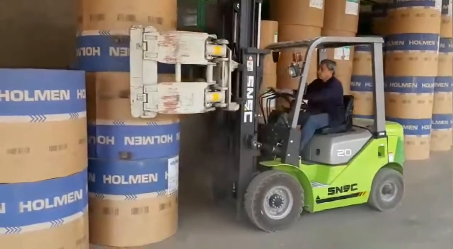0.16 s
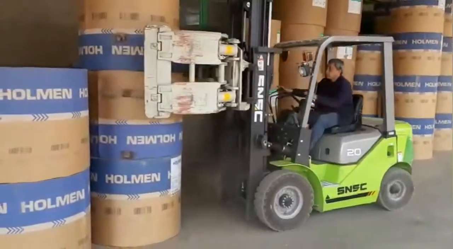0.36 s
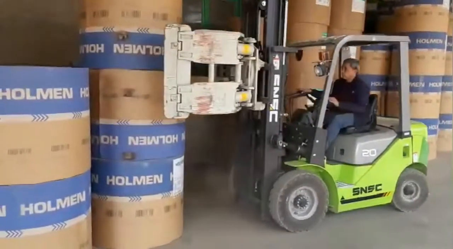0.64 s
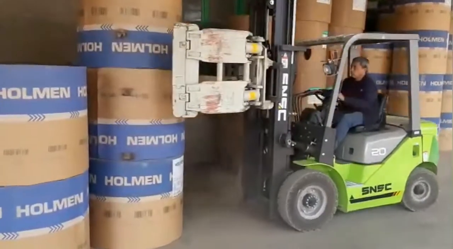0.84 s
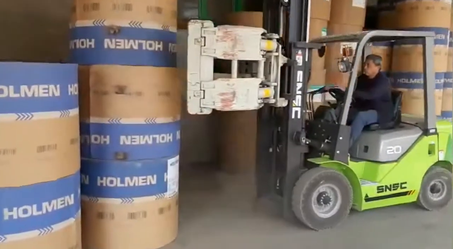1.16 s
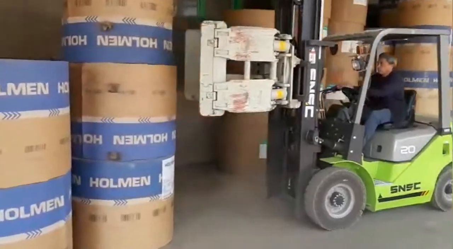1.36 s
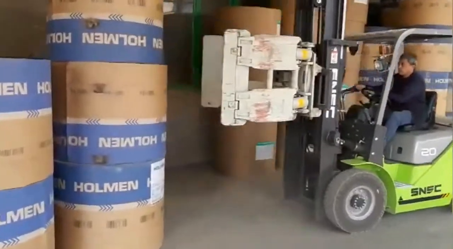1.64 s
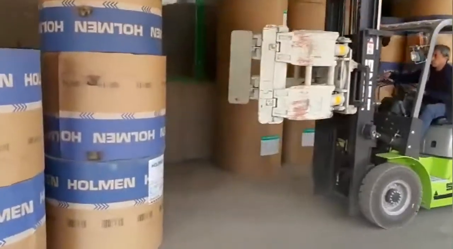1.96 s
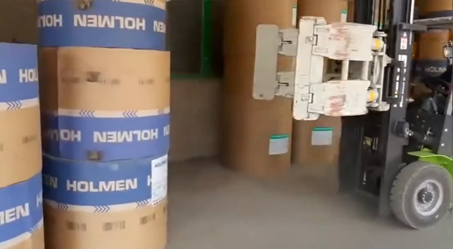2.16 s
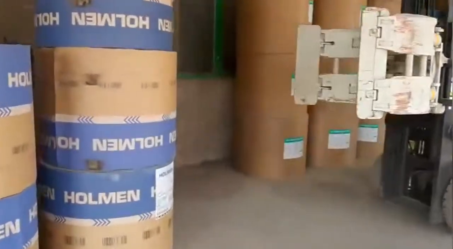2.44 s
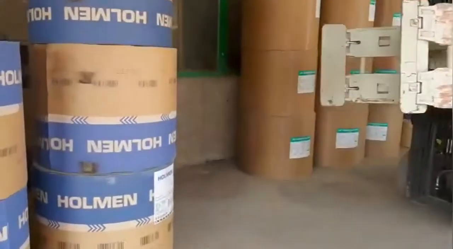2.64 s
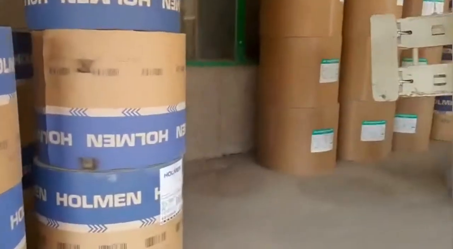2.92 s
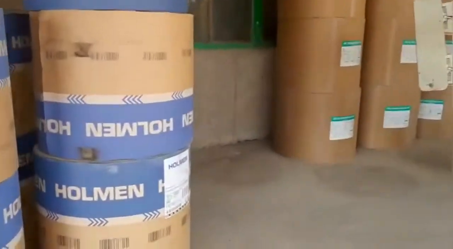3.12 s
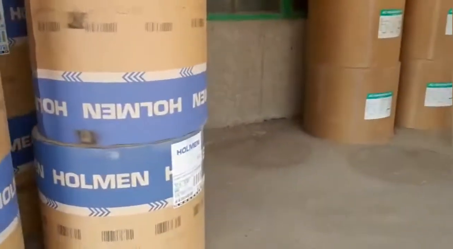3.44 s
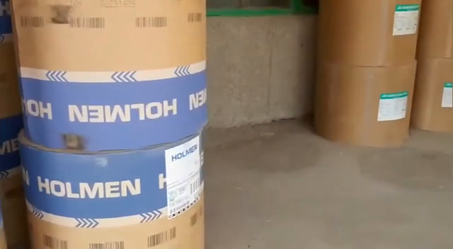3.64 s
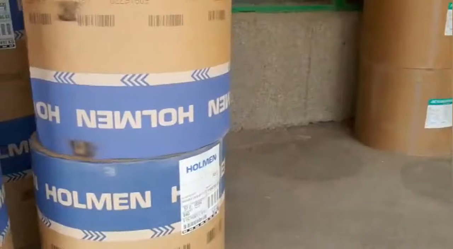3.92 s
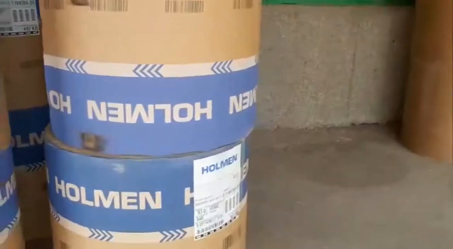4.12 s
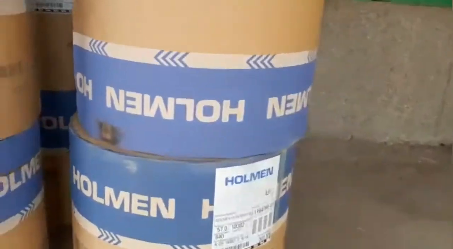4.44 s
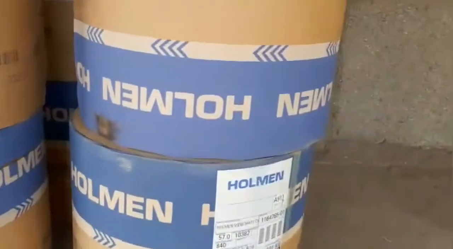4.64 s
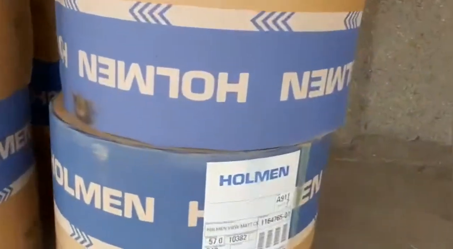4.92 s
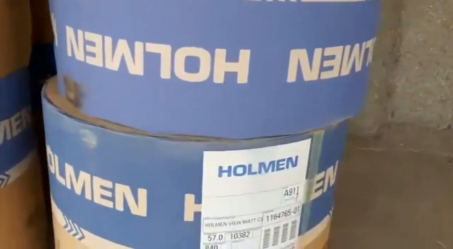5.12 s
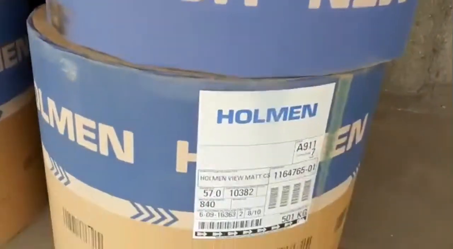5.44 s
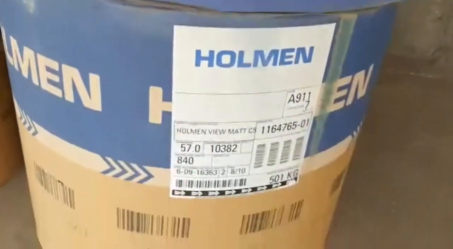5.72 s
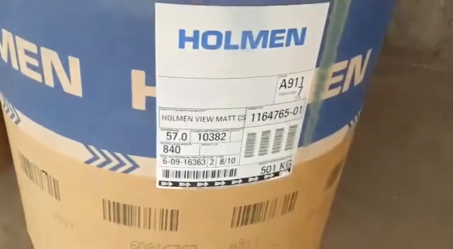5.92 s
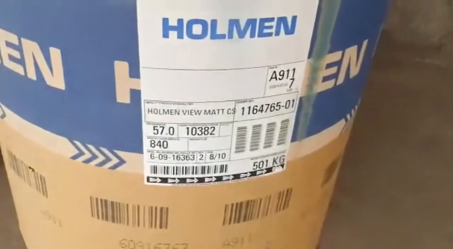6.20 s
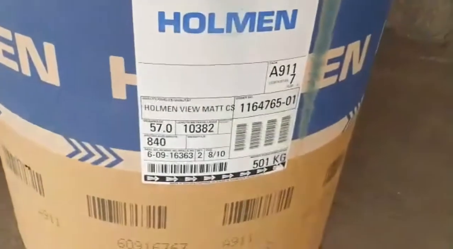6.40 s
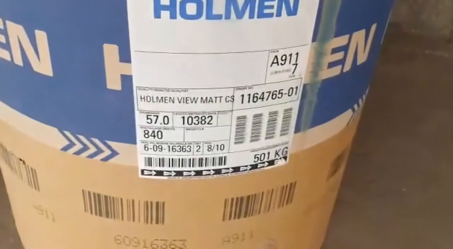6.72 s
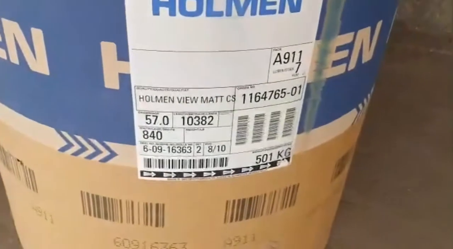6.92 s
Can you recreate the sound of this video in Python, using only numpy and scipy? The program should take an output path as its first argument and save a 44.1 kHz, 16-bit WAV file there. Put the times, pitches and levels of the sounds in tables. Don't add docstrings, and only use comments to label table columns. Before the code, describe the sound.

A diesel forklift runs in a hard, echoing warehouse, picked up by a phone with two spaced microphones and limited treble. From 0 to 1.5 s the engine pulls moderately, its low firing hum rising slightly, with faint plate pings around 0.4 to 0.6 s and a gear singing upward from about 1.1 to 1.7 s. At 1.8 s the pedal lifts: sharp steel clacks at 1.86 to 2.1 s, the engine sagging to its lowest near 2.1 s, with a soft thud. From 2.3 s it revs up strongly, more than doubling in pitch by 4 s, with growing roar, clatter and pump whine; a short ping sounds at 3.1 s. A dense, ringing clank cluster lands at 3.88 to 4 s. Then a loud steady drone and wavering whine continue to 7 s, with dull tyre bumps from 4.8 to 5.5 s and drumming panels.

```python
import sys
import numpy as np
from scipy import signal
from scipy.fft import rfft, irfft, next_fast_len
from scipy.io import wavfile
from scipy.ndimage import uniform_filter1d, map_coordinates

SR = 44100
rng = np.random.default_rng(int(sys.argv[2]) if len(sys.argv) > 2 else 0)


def unload_audio(sound):
    columns = np.transpose(np.atleast_2d(sound))
    steps = np.round(np.clip(columns, -1, 1) * 32767)
    wavfile.write(sys.argv[1], SR, steps.astype(np.int16))


def boost_factor(decibels):
    exponent = np.asarray(decibels, float) / 20
    return 10 ** exponent


N = 311346

# (time [s], peak level [dB], ring level [dB], burst t60 [s])
CLANKS = [(1.8597, -3, -30, .008), (1.8797, -1, -30, .008), (1.94, -11, -16, .03), (1.9794, -22, -11, .09),
          (2.0807, -24, -9, .06), (2.3444, -24, -9, .05), (3.8796, -14, -5, .07), (3.8931, -13, -4, .08),
          (3.9044, -13, -5, .09), (3.9274, -10, -5, .1), (3.9544, -11, -7, .16), (3.99, -15, -8, .12)]


def unit(x):
    return x / np.sqrt(np.mean(x ** 2) + 1e-20)


def along(points, hz):
    f, v = np.transpose(points)
    return np.interp(np.log(hz + 1), np.log(f + 1), v)


def curves(rows):
    s, *cols = np.transpose(rows)
    return [np.interp(np.arange(N) / SR, s, c) for c in cols]


def swelling(steady_db, rows):
    t = np.arange(N) / SR
    swells = sum(boost_factor(db) * np.exp(-((t - s) / length) ** 2) for s, db, length in rows)
    return 20 * np.log10(boost_factor(steady_db) + swells)


def wobble(rate):
    s = np.arange(0, N / SR + .01, .002)
    knots = rng.standard_normal(int(N * rate / SR) + 4)
    return np.interp(np.arange(N) / SR, s, map_coordinates(knots, [s * rate]))


def filtered(x, response):
    m = next_fast_len(N + SR // 2)
    return irfft(rfft(x, m) * response(np.fft.rfftfreq(m, 1 / SR)), m)[..., :N]


def drive():
    # (time [s], firing rate [firings/s])
    speed = [(0, 28.1), (.45, 31.2), (1.05, 34.8), (1.35, 36.2), (1.55, 35.6), (1.8, 31.7), (2.1, 26),
             (2.25, 27.6), (2.55, 37.1), (2.85, 45.4), (3.15, 52.4), (3.6, 59), (3.9, 62.1), (4.2, 63.45),
             (4.85, 64.75), (5.6, 65.15), (6.7, 64.13), (7.06, 64.2)]
    # (time [s], level [dB])
    effort = [(0.0, -10), (0.3, 0.7), (0.7, 2), (0.95, -0.2), (1.55, 2), (1.8, -9), (2.05, -23.5),
              (2.25, -21), (2.4, 4.5), (2.7, 2.24), (3.25, 0.72), (3.5, -4.5), (4.3, 2), (5.2, -1.5),
              (6.0, -3), (6.6, -7.5), (7.06, -6.5)]
    full_speed, flywheel_s = 64, .1
    rate = uniform_filter1d(curves(speed)[0], size=round(flywheel_s * SR), mode="nearest")
    gaining = uniform_filter1d(np.gradient(rate) * SR, size=4000)
    return rate, np.log10(rate / full_speed), gaining, curves(effort)[0]


def roar_levels():
    # (level at full speed [dB], speed slope [dB/decade], effort share, push [dB per firing/s2])
    layers = [
        (-23.5, 22, 0.082, 0.0829),
        (-34.5, 16.5, 0.054, 0.1071),
        (-36, 22, 0.0067, 0.236),
    ]
    _, decades, gaining, effort_db = drive()
    push = np.maximum(gaining, 0)
    return [db + slope_db * decades + share * effort_db + push_db * push
            for db, slope_db, share, push_db in layers]


def tone(firings, order, db, blur):
    # (time [s], delay [ms])
    lag = [(0, .06), (2.3, .1), (2.7, .27), (3.7, .23), (4.2, .11), (4.8, .11), (5.2, .42), (7.06, .4)]
    cycles = order * firings
    hz = np.gradient(cycles) * SR
    late = hz * (.3 + hz / 2300) * curves(lag)[0] / 1000
    own = blur * np.array([wobble(5), wobble(5)])
    shaft = 1.4 * blur * wobble(35)
    phase = 2 * np.pi * (cycles + rng.random() + late * np.array([[-.5], [.5]])) + own + shaft
    return np.sqrt(2) * boost_factor(db + 3 * own[::-1]) * np.sin(phase)


def exhaust(firings):
    # (frequency [Hz], order level [dB rms])
    pipe = [(28, -52.5), (36, -50.5), (46, -35), (62, -26), (75, -23), (115, -25), (160, -28.5), (330, -31)]
    # (order, level [dB], effort share, push [dB per firing/s2], far-wall null [Hz])
    firing_orders = [(1, -.9, 1.04, -.05, 53.8), (2, -2.5, .5, -.07, 75.9), (3, -8.5, .95, .38, 123.2),
                     (4, -10, 1.4, .7, 184), (5, -5, -.1, .1, 212.4)]
    # (time [s], path [m])
    wall_path = [(0.0, 0.96), (1.5, 1.11), (2.4, 1.32), (3.0, 0.82), (3.75, 0.22), (4.15, 1.43),
                 (4.5, 1.62), (4.8, 1.29), (5.5, 1.7), (6.2, 1.92), (7.06, 1.99)]
    upper = [(6.6, -16.5), (5.7, -16.5), (1.5, -22), (2.5, -16),  # (order, dB under the boom)
             (3.5, -17), (4.5, -16), (5.75, -22), (8, -21.5)]
    wall_echo = .88
    null_spacing_hz = 11.3
    rate, _, gaining, effort_db = drive()
    push = np.maximum(gaining, 0)
    lumpy_db = .5 + .1 * np.abs(gaining)
    load_db = roar_levels()[0]
    far = np.clip(.021 * gaining, 0, .8)
    path_s = curves(wall_path)[0] / 343
    hum = 0
    for k, db, share, push_db, null_hz in firing_orders:
        hz = k * rate
        near_wall = 1 + wall_echo * np.exp(2j * np.pi * hz * path_s)
        far_wall = 1 - far * np.exp(2j * np.pi * (hz - null_hz) / null_spacing_hz)
        far_wall = far_wall / np.sqrt(1 + far ** 2)
        walls_db = 20 * np.log10(np.abs(near_wall * far_wall))
        level_db = along(pipe, hz) + db + share * effort_db + push_db * push + walls_db
        hum = hum + tone(firings, k, level_db + lumpy_db * wobble(18), blur=.07)
    for k, db in upper:
        hum = hum + tone(firings, k, load_db + db + 3 * wobble(5), blur=.12)
    return hum


def pump(firings):
    # (tooth rate multiple, level at full speed [dB], speed slope [dB/decade])
    mesh = [
        (.5, -44.5, 16),
        (1, -38.5, 12),
        (2, -32.5, 80.5),
    ]
    # (time [s], tooth rate multiple, peak level [dB], length [s])
    focus = [(0.538, .5, -36, 0.09), (1.188, .5, -27.5, 0.1), (1.49, .5, -33, .15), (2.785, .5, -28, 0.043),
             (4.27, .5, -33.5, 0.21), (5.108, .5, -31, 0.11), (5.852, .5, -33.5, 0.08),
             (6.4, .5, -32, 0.036), (6.995, .5, -31.5, 0.24), (2.95, 1, -38.5, 0.1), (3.143, 1, -25.5, .07),
             (3.289, 1, -27.5, 0.019), (4.06, 1, -34.5, 0.093), (4.5, 1, -38.5, 0.04),
             (4.837, 1, -38, 0.032), (5.302, 1, -31, 0.092), (5.692, 1, -38, .06), (6.258, 1, -26.5, 0.2),
             (3.607, 2, -31.5, 0.15), (3.86, 2, -32, 0.14), (4.324, 2, -32, 0.23), (4.626, 2, -34, 0.043),
             (4.865, 2, -22.5, 0.046), (5.076, 2, -19.5, .06), (5.254, 2, -26, 0.055), (5.638, 2, -27, 0.1),
             (5.893, 2, -28, .08), (6.29, 2, -29.5, 0.093), (6.596, 2, -23.5, .13), (6.914, 2, -31, 0.083)]
    # (time [s], frequency [Hz], level [dB rms])
    axle = [
        (1.05, 850, -60),
        (1.2, 905, -47),
        (1.35, 990, -47),
        (1.5, 1095, -43),
        (1.65, 1150, -47),
        (1.8, 1160, -60),
    ]
    teeth = 12.46
    _, decades, gaining, _ = drive()
    levels = []
    for k, db, slope_db in mesh:
        swells = [(s, peak_db, length) for s, times, peak_db, length in focus if times == k]
        levels.append(swelling(db + slope_db * decades, swells))
    half_db, once_db, twice_db = levels
    revving = np.clip(.1 * np.abs(gaining), 0, 2)
    once_db = once_db + (1.5 + .9 * revving) * wobble(40)
    twice_db = twice_db + (1.5 + .8 * revving) * wobble(45)
    whine = tone(firings, teeth / 2, half_db + .53 * wobble(3.5), blur=.19)
    whine = whine + tone(firings, teeth, once_db, blur=.2 + .3 * revving)
    whine = whine + tone(firings, teeth * 2, twice_db, blur=.2 + .25 * revving)
    gear_hz, gear_db = curves([(0, 850, -99), *axle, (2, 1160, -99)])
    return whine + tone(np.cumsum(gear_hz) / SR, order=1, db=gear_db + .67 * wobble(29), blur=.2)


def rush(gain, patchy_db):
    # (frequency [Hz], left-right likeness)
    alike = [(60, .996), (140, .988), (320, .94), (600, .75), (1000, .35), (1750, -.05), (4000, 0)]
    z = signal.stft(rng.standard_normal((2, N)), nperseg=512)[2]
    field = uniform_filter1d(rng.standard_normal(z.shape[1:]), size=5, axis=0)
    field = uniform_filter1d(field, size=10, axis=1)
    pair = signal.istft(z * boost_factor(patchy_db * unit(field)), nperseg=512)[1][:, :N]

    def mid_side(hz):
        turn = np.arccos(np.clip(along(alike, hz), -1, 1)) / 2
        return gain(hz) * np.array([np.cos(turn), np.sin(turn)])

    mid, side = filtered(pair, mid_side)
    return unit(np.array([mid + side, mid - side]))


def roar(firings):
    # (frequency [Hz], density [dB per Hz])
    boom_shape = [(15, -38.5), (25, -32), (54, -8.5), (130, -10), (162, -1), (211, -2.5), (253, 0),
                  (312, 0.5), (515, -6), (700, -12.5), (910, -35.5), (1540, -120)]
    block_shape = [(260, -7), (450, -9.5), (696, -4), (803, -4), (877, -6), (1260, -7), (1520, -2.5),
                   (1600, -1), (1650, -7), (1720, -6), (2080, -2), (2380, -12), (3000, -16), (3900, -49),
                   (6600, -120)]
    clatter_shape = [(1400, -25), (2300, -2.5), (2700, -3), (3400, -2), (4900, -2.5), (5900, -7),
                     (6600, -10.5), (7500, -16), (7900, -20.5), (8500, -25.5), (9300, -28.5), (9900, -30),
                     (12000, -74.5)]
    # (frequency [Hz], width [Hz], level [dB])
    panels = [
        (206, 20, 0),
        (372, 24, -9),
    ]
    # (time [s], peak level [dB], length [s])
    shudders = [
        (3.401, -27.5, 0.11),
        (5.13, -27.5, .07),
        (5.5, -28, 0.053),
        (5.8, -27.5, 0.18),
        (6.299, -29, 0.23),
    ]
    # (time [s], peak level [dB], length [s])
    rattles = [
        (0.309, -43, .4),
        (1.991, -35, .025),
        (2.111, -40, 0.076),
        (3.902, -26, .018),
        (3.942, -32, 0.01),
        (4.011, -39, 0.028),
    ]
    boom_db, block_db, clatter_db = roar_levels()
    clatter_db = swelling(clatter_db, rattles)
    beat = .6 * np.cos(2 * np.pi * firings)
    uneven = wobble(14)
    surge = .05 * np.abs(drive()[2]) * wobble(25)

    def shape(points):
        return lambda hz: boost_factor(along(points, hz))

    def drum(f):
        return sum(boost_factor(db) * (f * w) ** 2 / ((c * c - f * f) ** 2 + (f * w) ** 2) for c, w, db in panels)

    boom = boost_factor(boom_db - 3 + beat + surge) * rush(shape(boom_shape), patchy_db=.5)
    block = boost_factor(block_db + 8.5 + beat + .81 * uneven) * rush(shape(block_shape), patchy_db=1.08)
    clatter = boost_factor(clatter_db + 4 + beat + .7 * uneven) * rush(shape(clatter_shape), patchy_db=.8)
    shaking = boost_factor(swelling(-38.5, shudders)) * rush(drum, patchy_db=-2.0)
    return boom + block + clatter + shaking


def knocks():
    # (frequency [Hz], level [dB], t60 [s])
    steel_modes = [(563, -3.5, 0.59), (1236, 7.5, 0.094), (1843, 7.5, 0.082), (2103, -1.5, 0.29),
                   (2110, 5, 0.079), (2725, 0, 0.12), (2720, -6.5, 0.08), (3276, -1.5, 0.087),
                   (3660, -14, 0.17), (3820, -2, 0.11), (4320, -11, 0.12), (4800, 3, 0.049),
                   (5270, -9, 0.095), (6050, -18, 0.031), (7700, -16, 0.026), (8020, -7, 0.12)]
    # (time [s], frequency [Hz], level [dB], t60 [s])
    pings = [
        (.36, 735, -38, .4),
        (.62, 1320, -34, .15),
        (.45, 2400, -38, .3),
        (1.98, 2100, -35, .25),
        (1.98, 1020, -36, .15),
        (3.128, 2185, -21, .08),
        (3.155, 2165, -23, .12),
    ]
    # (time [s], peak level [dB], frequency [Hz])
    bumps = [
        (2.188, -24, 69.7),
        (4.778, -21, 268),
        (4.926, -13, 308),
        (5.103, -15, 293),
        (5.273, -15.5, 269),
        (5.512, -18, 258),
    ]
    out = np.zeros(N + SR)
    t = np.arange(SR // 2) / SR

    def ring(hz, db, t60, rise):
        return boost_factor(db - 60 * t / t60) * np.sin(2 * np.pi * hz * t) * (1 - np.exp(-t / rise))

    def strike(s, sound):
        out[round(s * SR):][:len(t)] += sound

    for s, db, ring_db, burst_t60 in CLANKS:
        steel = 0
        for hz, level, t60 in steel_modes:
            struck_hz = hz * rng.normal(1, .0099)
            steel = steel + ring(struck_hz, level + ring_db + rng.normal(0, 1.5), t60, .00099)
        burst = np.convolve(rng.standard_normal(len(t)), [1, 0, 0, 0, -1], "same")
        burst = burst * boost_factor(-5.0 - 60 * t / burst_t60) * (1 - np.exp(-t / .00092))
        strike(s, boost_factor(db - 11) * (steel + burst))
    for s, hz, db, t60 in pings:
        strike(s, ring(hz, db + 8.5, t60, .0035))
    for s, db, hz in bumps:
        strike(s, ring(hz, db + 3.0, .078, .0023))
    return filtered(out[:N], lambda hz: boost_factor(-17.5) + 1 / (1 + (hz / 7700) ** 24))


def hall(x):
    # (frequency [Hz], t60 [s])
    decay_times = [(200, 0.98), (2000, 0.33), (8000, 0.32)]
    hz, t, z = signal.stft(rng.standard_normal((2, SR)), SR, nperseg=256)
    tail = signal.istft(z * boost_factor(-60 * t / along(decay_times, hz)[:, None]), SR, nperseg=256)[1]
    tail = tail / np.linalg.norm(tail[0])
    return signal.fftconvolve(np.pad(x, (500, 0))[None], tail, axes=1)[:, :N]


def scene():
    firings = np.cumsum(drive()[0]) / SR
    engine = exhaust(firings) + pump(firings) + roar(firings)
    hits = knocks()
    apart = round(.00007 * SR)
    direct = np.array([np.roll(hits, apart), hits])
    return engine + direct + boost_factor(-11.0) * hall(hits)


def phone_thinning(x):
    # (frequency [Hz], step over the usual level [dB])
    coarse = [(300, -16), (1000, -6), (1600, -2), (2300, -8), (2700, 6), (5000, 6.5), (6100, 9.5),
              (6800, 5), (7500, 5), (8000, 20), (9300, 18.5), (10000, 22)]
    hop, first = 1024, 636
    scatter_db = 7
    pair = np.array([x[0] + x[1], x[0] - x[1]]) / 2
    pair = np.pad(pair, ((0, 0), (2 * hop - first, 3 * hop)))
    n, k = np.arange(2 * hop), np.arange(hop // 2)
    basis = np.cos(np.pi / hop * np.outer(n + .5 + hop / 2, k + .5)) * np.sqrt(2 / hop)
    basis = basis * np.sin(np.pi * (n + .5) / 2 / hop)[:, None]
    count = pair.shape[1] // hop - 1
    z = np.array([ch[n + hop * np.arange(count)[:, None]] @ basis for ch in pair])
    usual = uniform_filter1d(uniform_filter1d(z ** 2, size=9, axis=1), size=33, axis=2)
    luck = rng.standard_normal((2, count, hop // 16))
    luck = uniform_filter1d(luck, size=2, axis=1)[..., k // 16]
    luck = .8 * luck + .42 * rng.standard_normal((count, 1))
    attacks = [round((row[0] * SR - first) / hop) + j for row in CLANKS for j in (1, 2)]
    luck[:, attacks] -= .8
    step_db = along(coarse, k * SR / 2 / hop) + scatter_db * luck
    step = np.sqrt(np.abs(usual) + 1e-20) * boost_factor(step_db)
    kept = np.sign(z) * np.floor(np.abs(z) / step + .4) * step
    frames = np.array([ch @ basis.T for ch in kept])
    joined = (frames[:, 1:, :hop] + frames[:, :-1, hop:]).reshape(2, -1)
    mid, side = joined[:, hop - first:][:, :N]
    return np.array([mid + side, mid - side])


def top_cut(x):
    return signal.sosfilt(signal.butter(12, 10050, fs=SR, output="sos"), x)


def record(dry):
    # (frequency [Hz], left minus right [dB])
    lean = [(60, -.3), (250, 0), (570, 2), (1000, 4.5), (1750, 6.5), (3070, 2), (5400, 2), (6200, 3),
            (7000, 15), (10000, 14)]
    tilted = filtered(dry, lambda hz: boost_factor(along(lean, hz) * np.array([[.5], [-.5]])))
    phone = phone_thinning(tilted)
    return top_cut(phone)


dry = scene()
out = record(dry)
unload_audio(out)
```